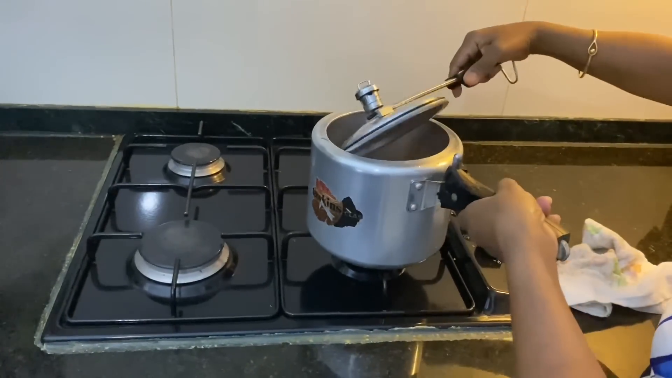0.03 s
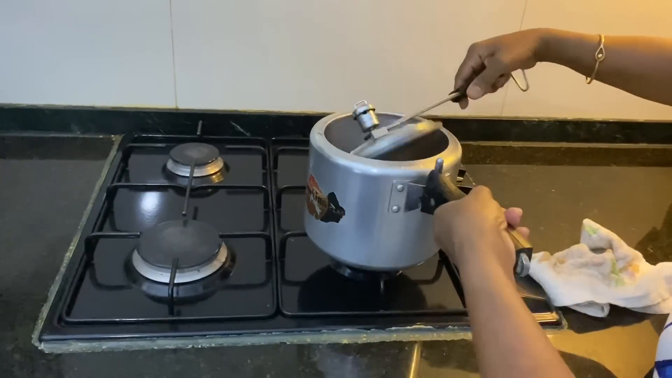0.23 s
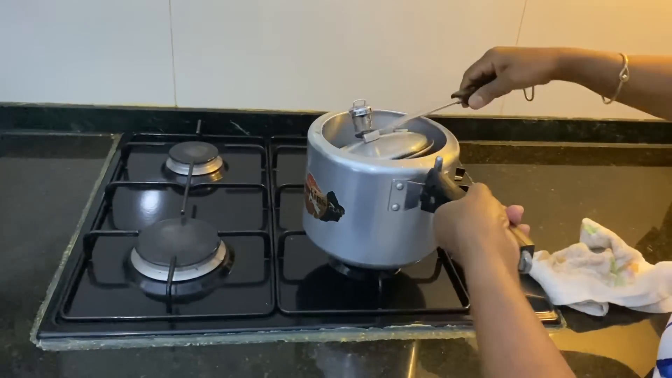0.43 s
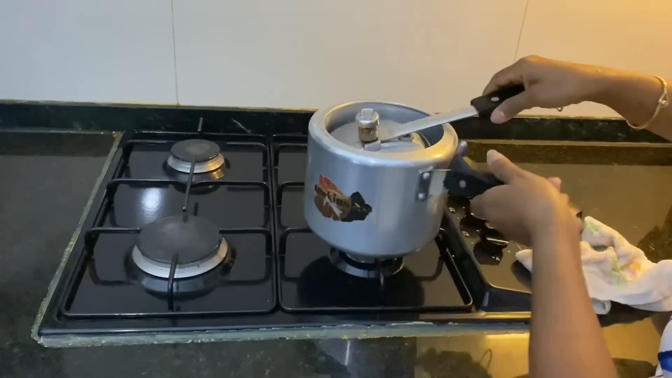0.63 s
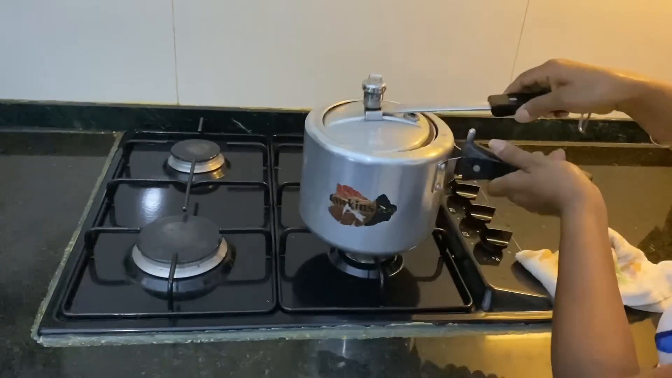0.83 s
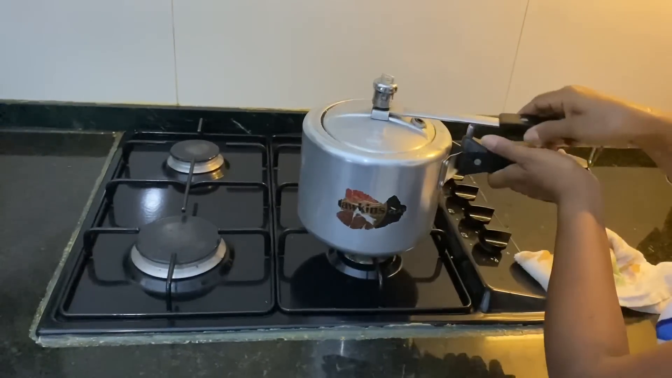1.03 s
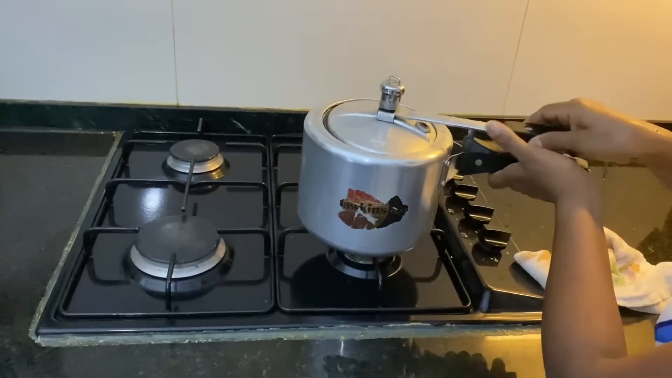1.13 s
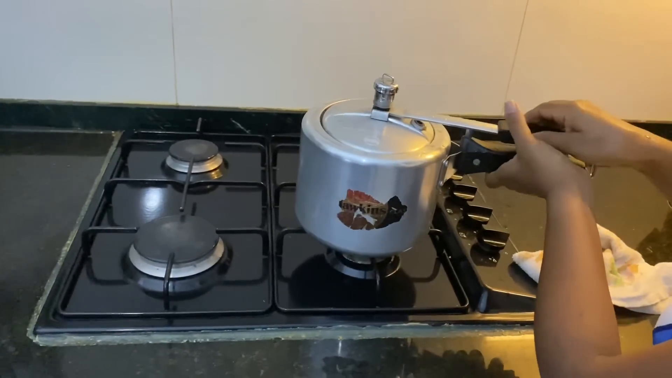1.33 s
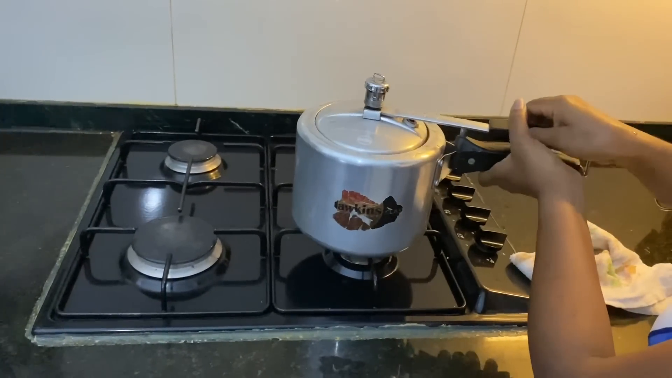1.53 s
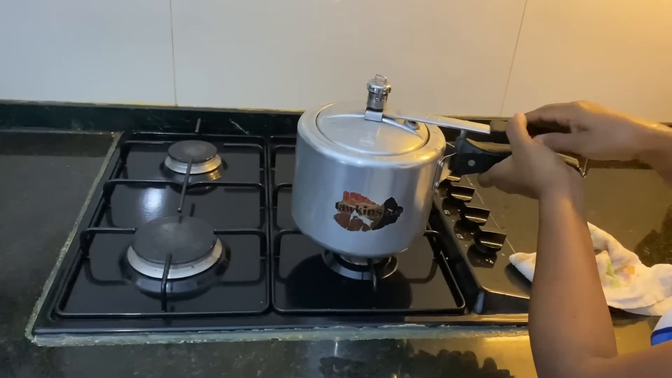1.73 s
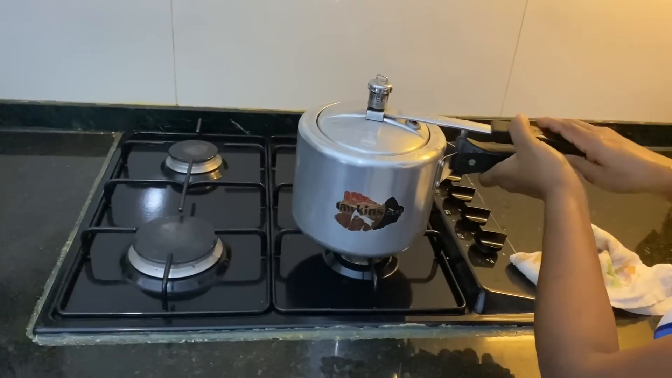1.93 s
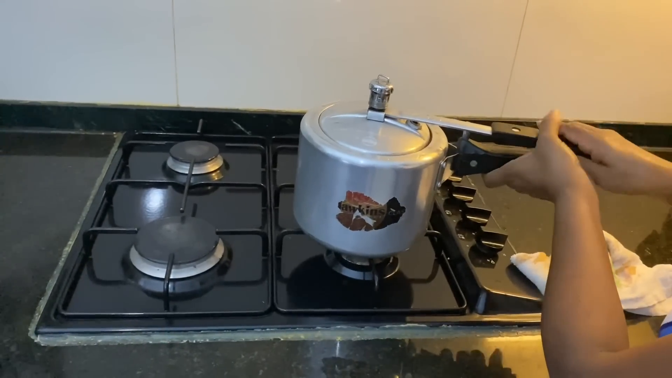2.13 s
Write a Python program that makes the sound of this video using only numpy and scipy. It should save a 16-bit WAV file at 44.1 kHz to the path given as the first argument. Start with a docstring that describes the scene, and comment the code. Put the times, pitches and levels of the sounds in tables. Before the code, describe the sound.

A pressure cooker's aluminium lid knocks and scrapes into its seat, then handles click in a kitchen

```python
"""Low mains hum and room noise are heard first, with faint rubbing; then a pressure cooker's lid arrives.
The aluminium lid knocks the rim, scrapes round and is pulled up into its seat; late on, two handles click.
Knocks and clicks are short blows that set off fading tones (modes), plus a noisy crackle. Rubbing is gritty
noise through the pot's modes, with a wavering tone for the air inside, which sinks in pitch as the lid closes.
A tiled kitchen answers with fading noise echoes; left and right differ in phase, most in the treble."""
import sys
import numpy as np
from scipy import signal
from scipy.fft import rfft, irfft, next_fast_len
from scipy.io import wavfile
from scipy.ndimage import map_coordinates

SR = 44100
rng = np.random.default_rng(int(sys.argv[2]) if len(sys.argv) > 2 else 0)


def digitize_waveform(pressure):
    """Quantize a signal to 16-bit integers and store it at the path in sys.argv[1].

    Rows of a 2-D input are taken as channels; values are limited to [-1, 1].
    """
    field = np.atleast_2d(pressure).T
    bounded = np.clip(field, -1, 1)
    quanta = np.round(bounded * 32767).astype(np.int16)
    wavfile.write(sys.argv[1], SR, quanta)


N = 94815  # length in samples

# Room noise colour: f/Hz, level/dB (only the shape counts)
ROOM_NOISE_COLOUR = [(45, 10), (100, -6.5), (300, 8), (1000, -2.5), (3000, -33), (8000, -43), (16000, -25)]
# How alike left and right are in echoes and room noise, treble is the same in both: f/Hz, likeness (1 = same)
LEFT_RIGHT_LIKENESS = [(60, 0.74), (300, 0.56), (1500, 0.098), (3000, 0.16), (6500, 1)]
# Strength of the rubbing: t/s, metal level/dB, air level/dB
SCRAPE_LEVELS = [(0, -44.5, -58), (.19, -47.5, -48), (.24, -22, -25), (.38, -37.5, -44), (.77, -39, -39.5),
                 (.95, -33.5, -63), (1.2, -36.5, -82), (1.42, -43, -53), (2.15, -55.5, -55)]
# Colour of the grit that rubs the metal: f/Hz, level/dB
GRIT_COLOUR = [(100, 11), (1000, -2), (3000, -8), (7000, -17.5), (16000, -21)]
# Ringing modes of the pot: f/Hz, level/dB, time to fade by 60 dB/s
POT_MODES = [(370, -6.5, 0.1), (855.6, -1, 0.13), (1037.4, -0.5, 0.24), (1297, -4, 0.043),
             (2116, -7.5, 0.095), (2420, -9, 0.063), (2635, 4.5, 0.12), (2775, -7.5, 0.21),
             (4106, -2, 0.057), (4277, -2.5, 0.2), (5706, 2.5, 0.017)]
# Tone of the air in the pot: t/s, f/Hz, level when knocked/dB
AIR_TONE = [(0.222, 445.5, 4), (0.4, 400, 8), (0.781, 366.9, 8), (0.821, 342, -4), (0.866, 260.4, 7),
            (0.998, 241, -3.5), (1.248, 161.2, -6.5)]
# How long the kitchen's echoes last: f/Hz, time to fade by 60 dB/s
KITCHEN_FADE = [(150, 0.29), (2000, 0.37), (15000, 0.2)]
# Lid on pot: t/s, free ringing time/s, then drive/dB around each frequency of KNOCK_REGIONS
LID_KNOCKS = [(0.19, 0.075, -66, -43, -37.5, -33.5, -37, -52.5),
              (0.216, 0.0086, -7.5, -19.5, -19.5, -18, -18.5, -20),
              (0.232, 0.23, -22, -31, -30, -28, -17.5, -30.5),
              (0.291, 0.0089, -26, -27, -25, -27, -24, -28.5),
              (0.352, 0.021, -28.5, -55, -64, -51, -30, -43.5),
              (0.463, 0.09, -40, -66, -49, -47.5, -44, -57),
              (0.602, 0.0087, -33, -36.5, -32, -37.5, -35, -47),
              (0.659, 0.046, -34.5, -31.5, -37, -41.5, -68, -62),
              (0.714, 0.024, -34, -33.5, -26.5, -32, -38.5, -60),
              (0.788, 0.047, -22, -27, -11.5, -25.5, -23, -36),
              (0.837, 0.018, -18, -25, -16.5, -19, -25.5, -32.5),
              (0.852, 0.019, -17, -15.5, -25.5, -19.5, -37, -40),
              (0.865, 0.012, -15.5, -43, -55, -22, -26, -28),
              (0.934, 0.038, -29.5, -25.5, -37, -24, -28.5, -30.5),
              (0.978, 0.045, -26, -34, -24.5, -27.5, -29, -37.5),
              (1.033, 0.0046, -19.5, -34, -24, -16, -30.5, -38.5),
              (1.046, 0.02, -33, -19.5, -31, -32, -25.5, -41.5),
              (1.097, 0.0045, -25, -32, -28.5, -30.5, -30.5, -43),
              (1.23, 0.043, -23, -26.5, -37.5, -39, -39, -38.5),
              (1.249, 0.0055, -20, -28, -26.5, -33.5, -30.5, -32.5),
              (1.268, 0.019, -20, -30, -48, -32.5, -29.5, -39),
              (1.285, 0.011, -24.5, -27.5, -30, -27.5, -50, -49),
              (1.321, 0.0065, -45, -47, -37, -31.5, -38, -53)]
# Regions that a knock drives: f/Hz
KNOCK_REGIONS = [400, 860, 1040, 2635, 4200, 8000]
# As the lid turns, extra drive near TWIN_HZ, added to the knock's own drive there: t/s, level/dB
TWIN_DRIVE = [(.22, -5), (.35, 19.5), (.72, 10), (.8, 7.5), (.84, -2), (1.03, 2.5)]
# Handle on handle: t/s, free ringing time/s, then drive/dB around each frequency of CLICK_REGIONS
HANDLE_CLICKS = [(1.445, 0.014, -44, -38, -38.5, -38, -66.5), (1.481, 0.0043, -18, -22, -12.5, -23, -34.5),
                 (1.489, 0.0072, -24.5, -23, -21.5, -37, -32), (1.74, 0.053, -29, -39, -36, -35.5, -42.5),
                 (1.886, 0.0066, -73, -60, -51, -47, -44.5), (1.901, 0.0063, -88, -26.5, -27, -38, -28),
                 (2.015, 0.0045, -24.5, -30.5, -21.5, -35, -48), (2.02, .006, -38, -46, -26, -53, -70)]
# Regions that a click drives: f/Hz
CLICK_REGIONS = [900, 2290, 2720, 4500, 11000]
# Ringing modes of the handles: f/Hz, level/dB, time to fade by 60 dB/s
HANDLE_MODES = [(393, -3, 0.05), (875, 0, 0.023), (1501, -1.5, 0.028), (2295, -1.5, 0.1), (2682, 1, 0.021),
                (4250, -21, 0.02), (4844, -8, 0.04)]
# Balance of the direct pot sound: f/Hz, left over right/dB
LEFT_LEAN = [(100, -2.5), (1040, 1), (5000, 2), (8000, 0)]
# Phase between left and right: f/Hz, left ahead of right/radians
LEFT_RIGHT_PHASE = [(1900, 0.9446), (7400, 0.5), (9000, -5), (11200, -4), (13500, -11.5), (16000, -20.5)]
# Tone of the microphone: f/Hz, level/dB
MIC_TONE = [(20, -34), (55, -5.5), (10000, 3), (13000, -2), (16000, -26)]

HUM_HZ, HUM_DB, ROOM_NOISE_DB = 59.6, -38, -52  # typical levels, ahead of the microphone
KITCHEN_DB = -4  # gain of the kitchen's answer
AIR_T60 = 0.068  # s, fade by 60 dB of the knocked air
TWIN_HZ = 2780
CHATTER_SHARE = 0.39  # part of the free ringing time before the chatter fades
FIRST_BLOW_SHARE = 0.8  # part of the push's energy in the first contact; chatter has the rest
CRACK_LOW_HZ = 400  # the crackle thins below this
TOP_HZ = 16800  # nothing is kept from here up


def amp(db):
    """Decibels to a plain gain."""
    return 10 ** (np.asarray(db) / 20)


def unit(x):
    """Scale a sound to an average (RMS) strength of 1."""
    return x / np.sqrt(np.mean(x ** 2) + 1e-20)


def along(points, hz):
    """Read a table of (f/Hz, value) points, with frequency on a log axis."""
    f, values = np.transpose(points)
    return np.interp(np.log(hz + 1), np.log(f + 1), values)


def curves(rows):
    """Turn each column after the time into one value per sample."""
    times, *columns = np.transpose(rows)
    return [np.interp(np.arange(N) / SR, times, column) for column in columns]


def wobble(rate):
    """A smooth random curve through `rate` random points a second."""
    points = rng.standard_normal(int(N * rate / SR) + 4)
    return map_coordinates(points, [np.arange(N) * rate / SR])


def filtered(x, response):
    """Multiply the spectrum of x by a response that depends on frequency."""
    size = next_fast_len(x.shape[-1] + SR // 2)
    spectrum = rfft(x, size) * response(np.fft.rfftfreq(size, 1 / SR))
    return irfft(spectrum, size)[..., :x.shape[-1]]


def ring(f, hz, db, t60):
    """Response of one mode, a fading tone that a unit blow starts at level db."""
    damping = np.log(1000) / np.pi / t60
    return amp(db) * SR / (2 * np.pi) * 1j * f / (hz * hz - f * f + 1j * f * damping)


def spread(pair):
    """Mix two unrelated signals into a left and right that are partly alike, and the same in the treble."""
    def mix(hz):
        angle = np.arccos(np.clip(along(LEFT_RIGHT_LIKENESS, hz), -1, 1)) / 2
        return np.array([np.cos(angle), np.sin(angle)])

    mid, side = filtered(pair, mix)
    return np.array([mid + side, mid - side])


def background():
    """Mains hum is a sine, slightly unsteady in level and phase; room noise is coloured random noise."""
    phase = 2 * np.pi * HUM_HZ * np.arange(N) / SR + 0.12 * wobble(10)
    hum = np.sqrt(2) * amp(HUM_DB + 2.3 * wobble(11.12)) * np.sin(phase)
    noise = filtered(rng.standard_normal((2, N)), lambda hz: amp(along(ROOM_NOISE_COLOUR, hz)))
    return hum + amp(ROOM_NOISE_DB + 1.1 * wobble(2.51)) * unit(spread(noise))


def scrape():
    """Gritty rubbing rings the pot's modes; the air in the pot sounds along as a narrow wavering tone."""
    def metal_response(f):
        direct_grit = amp(43.5)
        ringing = sum(ring(f, *mode) for mode in POT_MODES)
        return amp(along(GRIT_COLOUR, f)) * (direct_grit + ringing)

    metal_db, air_db = curves(SCRAPE_LEVELS)
    grit = rng.standard_normal(N) * amp(3.5 * wobble(300))
    metal = filtered(grit, metal_response)
    air_hz = curves(AIR_TONE)[0] * (1 + 0.0504 * wobble(60))
    air = np.sin(2 * np.pi * np.cumsum(air_hz) / SR) * amp(4.6 * wobble(30.1))
    return amp(metal_db) * unit(metal) + amp(air_db) * unit(air)


def kitchen(x):
    """Echoes as noise tails, each frequency fading at its own speed; each stretch of sound gets a new tail."""
    out = np.zeros((2, N + 2 * SR))
    step, delay = SR // 12, 250  # samples
    for start in range(0, N, step):
        hz, t, noise = signal.stft(rng.standard_normal((2, SR // 2)), SR, nperseg=256)
        fade = amp(-60 * t / along(KITCHEN_FADE, hz)[:, None])
        tail = signal.istft(noise * fade, SR, nperseg=256)[1]
        tail = tail / np.linalg.norm(tail[0])
        wet = signal.fftconvolve(x[None, start:start + step], tail, axes=1)
        out[:, start + delay:][:, :wet.shape[1]] += wet
    return spread(out[:, :N])


def blow(out, s, free_s, drive, modes, crack_db, rise_s, follows, chatter_t60, muffled_t60):
    """A first blow and a short chatter ring the modes and crackle; after free_s the touching parts muffle it."""
    t = np.arange(SR // 2) / SR
    rise = 1 - np.exp(-t / rise_s)
    chatter_fade = amp(-60 * np.maximum(t - CHATTER_SHARE * free_s, 0) / chatter_t60)
    chatter = rng.standard_normal(len(t)) * rise * chatter_fade
    chatter = chatter / np.linalg.norm(chatter)
    first_contact = t == 0
    push = np.sqrt(1 - FIRST_BLOW_SHARE) * chatter + np.sqrt(FIRST_BLOW_SHARE) * first_contact

    # Each blow drives each mode a little differently
    scatter_db = 1.5 * rng.standard_normal(len(modes))
    driven = [(hz, db + along(drive, hz) + extra, t60)
              for (hz, db, t60), extra in zip(modes, scatter_db)]
    tone = filtered(push, lambda f: sum(ring(f, *mode) for mode in driven))

    # The crackle's colour partly follows the drive, starting from its highest region
    top_db = drive[-1][1]

    def crack_response(f):
        colour_db = crack_db + top_db + follows * (along(drive, f) - top_db)
        return amp(colour_db) * f / np.hypot(f, CRACK_LOW_HZ)

    crack = filtered(chatter, crack_response)
    muffle = amp(-60 * np.maximum(t - free_s, 0) / muffled_t60)
    return out + np.pad(tone * rise * muffle + crack, (round(s * SR), N))[:N]


def lid():
    """Every knock rings the pot and the air in it, whose pitch sinks as the lid closes."""
    out = np.zeros(N)
    times, air_hz, air_db = np.transpose(AIR_TONE)
    for s, free_s, *drive_db in LID_KNOCKS:
        air_mode = (np.interp(s, times, air_hz), np.interp(s, times, air_db), AIR_T60)
        drive = list(zip(KNOCK_REGIONS, drive_db))
        twin_db = along(drive, TWIN_HZ) + np.interp(s, *np.transpose(TWIN_DRIVE))
        drive = sorted(drive + [(TWIN_HZ, twin_db)])
        out = blow(out, s, free_s, drive, POT_MODES + [air_mode], crack_db=34, rise_s=0.00066,
                   follows=0.61, chatter_t60=0.042, muffled_t60=0.011)
    return out


def handles():
    """Handle knocking handle: blows ring the handles' modes as short dry clicks."""
    out = np.zeros(N)
    for s, free_s, *drive_db in HANDLE_CLICKS:
        drive = list(zip(CLICK_REGIONS, drive_db))
        out = blow(out, s, free_s, drive, HANDLE_MODES, crack_db=26, rise_s=0.00034,
                   follows=0.88, chatter_t60=0.02, muffled_t60=0.081)
    return out


def scene():
    """Add the direct pot sound, the kitchen's answer to it, and the background."""
    pot = lid() + scrape() + handles()
    halves = np.array([[.5], [-.5]])  # half the lean up on the left, half down on the right
    near = filtered(pot, lambda hz: amp(along(LEFT_LEAN, hz) * halves))
    return near + amp(KITCHEN_DB) * kitchen(pot) + background()


def record(dry):
    """Left and right differ in phase, most in the treble; the microphone thins both ends, with none from TOP_HZ."""
    def response(hz):
        # Below the first table point the phase shrinks evenly to zero
        shrink = np.minimum(hz / LEFT_RIGHT_PHASE[0][0], 1)
        phase = np.interp(hz, *np.transpose(LEFT_RIGHT_PHASE)) * shrink
        turn = np.exp(.5j * phase * np.array([[1], [-1]]))
        return turn * amp(along(MIC_TONE, hz)) * (hz < TOP_HZ)

    return filtered(dry, response)


dry = scene()
out = record(dry)
digitize_waveform(out)
```